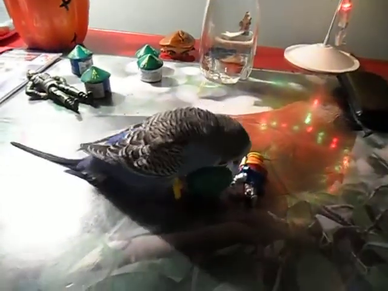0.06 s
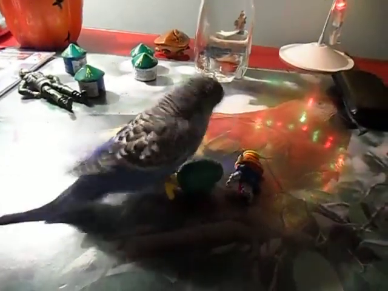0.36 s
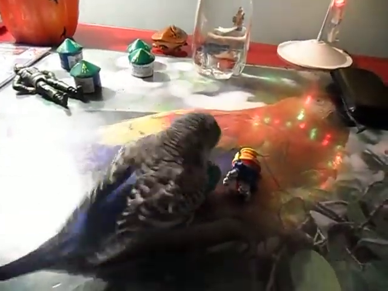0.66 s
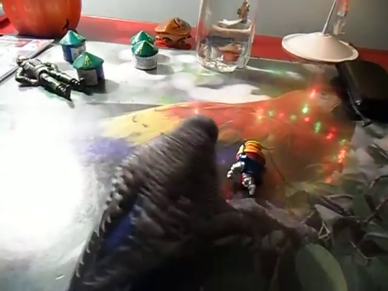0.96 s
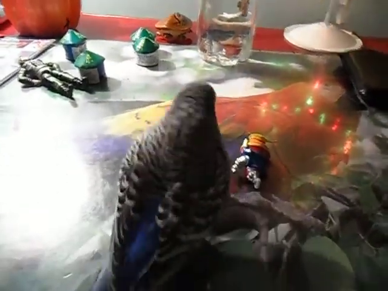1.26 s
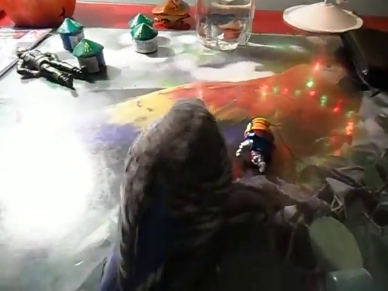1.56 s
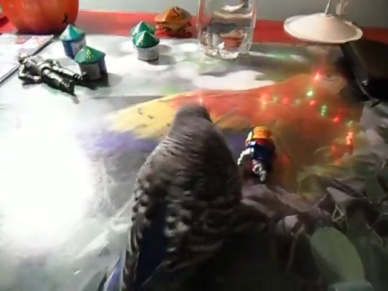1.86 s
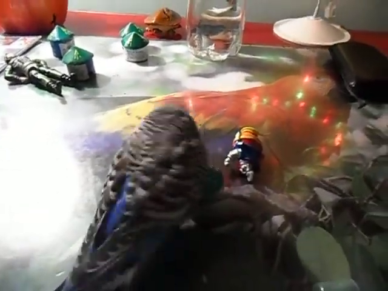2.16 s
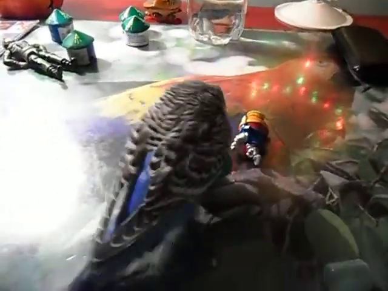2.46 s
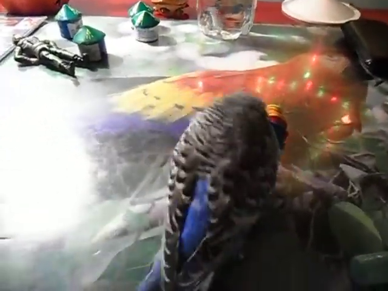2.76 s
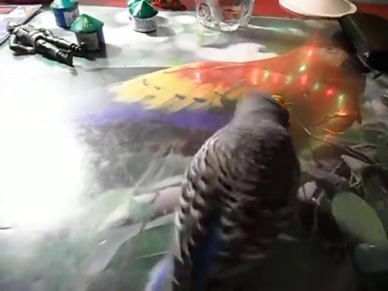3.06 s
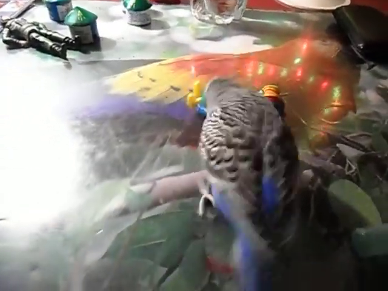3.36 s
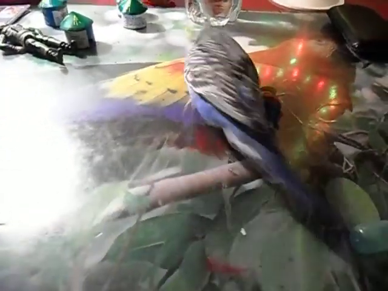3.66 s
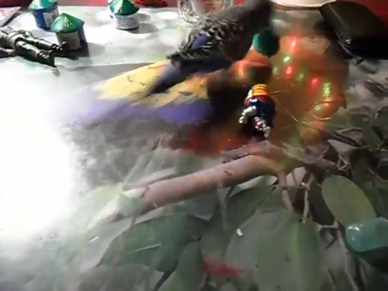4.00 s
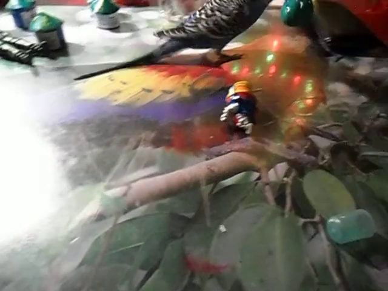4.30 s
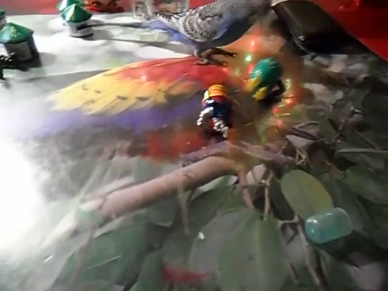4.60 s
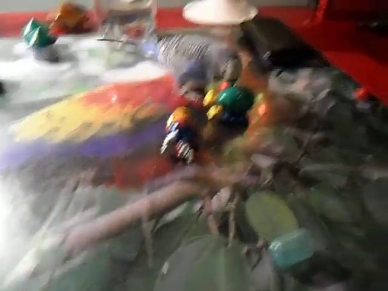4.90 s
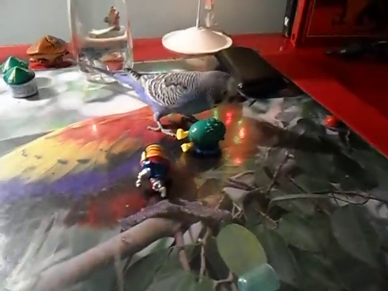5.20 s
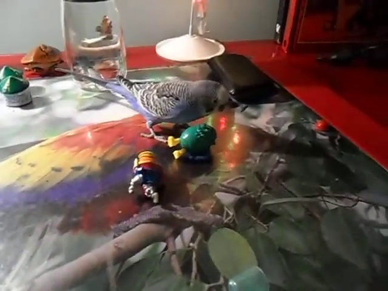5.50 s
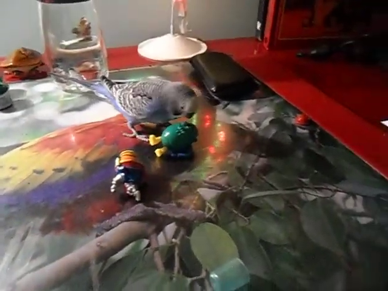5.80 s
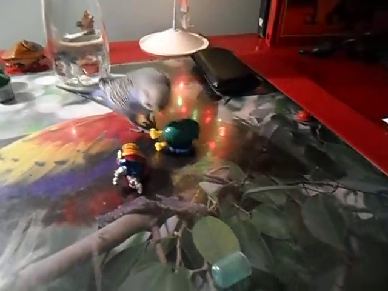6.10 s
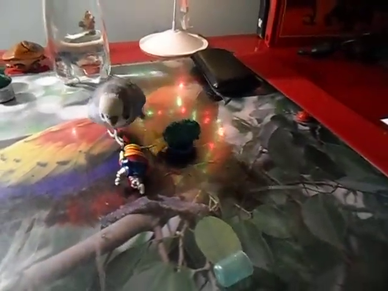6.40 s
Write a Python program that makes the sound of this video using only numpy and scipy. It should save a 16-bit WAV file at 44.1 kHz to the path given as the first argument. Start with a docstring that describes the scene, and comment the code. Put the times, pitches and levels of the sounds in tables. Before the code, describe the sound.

Close to the microphone in a quiet room, a small pet bird chirps raspily and pecks at plastic toys, making light irregular clicks and soft thuds on a tabletop. Two loud knocks of a dropped toy come about halfway, then a brief chirp and a third, doubled knock. The bird whistles one soft warble and taps on sparsely, over a faint rustle and steady hum.

```python
"""A short raspy chirp comes first: a budgerigar on a covered table in a quiet room, one microphone near.
Its beak clicks on small plastic toys, its claws scratch the cover, feet and toys bump the tabletop,
and three times a toy drops with a loud, ringing knock. The syrinx buzzes a few more chirps and
whistles one soft warble. Behind the bird lie a faint rustle and the room's steady hum and hiss."""
import sys
import numpy as np
from scipy import signal
from scipy.fft import rfft, irfft, next_fast_len
from scipy.io import wavfile
from scipy.ndimage import map_coordinates

SR = 44100
rng = np.random.default_rng(int(sys.argv[2]) if len(sys.argv) > 2 else 0)


def int16_out(signal):
    """Quantize to a 16-bit WAV file."""
    q = np.round(np.clip(np.atleast_2d(signal).T, -1, 1) * 32767)
    wavfile.write(sys.argv[1], SR, q.astype(np.int16))


N = 284445

# where the bird is busy on the table: t/s, length/s, rustle level/dB
BUSY_SPELLS = [(0, 1.92, -72), (3.949, 0.93, -71), (5.701, .72, -72.5)]
# toys and feet landing on the tabletop, near the microphone: t/s, level/dB, nominal f/Hz
BUMPS = [(0.6603, -41.5, 660), (0.8649, -38, 687), (0.8852, -38.5, 700), (1.0938, -47, 1090),
         (1.1173, -42.5, 610), (1.3355, -45.5, 488), (1.346, -37.5, 1005), (1.3739, -42, 1020),
         (1.5461, -45.5, 690), (3.143, -43.5, 1460), (3.31, -12, 811), (3.434, -38.5, 715),
         (3.6753, -13, 772), (4.0912, -41, 1064), (4.2696, -46, 940), (4.4245, -16.5, 940),
         (4.4594, -20, 820), (4.6146, -45.5, 770), (4.6398, -44.5, 637), (4.7407, -49, 1050),
         (4.8442, -46, 880), (4.958, -41, 1032), (5.9552, -48, 557), (6.0937, -46.5, 950)]
# spectrum of the tabletop's dead thud: f/Hz, level/dB
THUD_SPECTRUM = [(60, -37), (140, -19.5), (220, -15.5), (330, -9), (450, -7), (610, 5.5), (1000, 2),
                 (1350, -5.5), (1700, -12), (2300, -17.5), (3700, -25), (4700, -44.5), (9000, -44)]
# modes of the hollow toy: f/Hz, level/dB, t60/s
TOY_MODES = [(1290, -32.5, 0.05), (1790, -26.5, 0.029), (2295, -37.5, 0.059), (2900, -31, 0.032),
             (3440, -24, 0.0069)]
# modes of the tabletop: f/Hz, level/dB, t60/s
TABLETOP_MODES = [(629, -20.5, 0.3), (711, -19.5, .16), (910, -38, .1), (1011, -35.5, 0.08),
                  (1130, -47, 0.12)]
def knocks():
    """Each bump is a dead thud, higher for a harder contact; the toy rings briefly, the table longer."""
    out = np.zeros(N)
    soft_to_hard_db = [-40, -25]
    footfalls = faint_contacts(per_s=2, db=-46.5, hz=780)
    for start, db, nominal_hz in BUMPS + footfalls:
        hardness = (nominal_hz / 820) ** 0.75
        thud = crest(impulse(lambda hz: along(THUD_SPECTRUM, hz / hardness)))
        t = np.arange(len(thud)) / SR
        # a gentle contact lasts longer, so it carries less treble and more ring
        cutoff_hz = np.interp(db, soft_to_hard_db, [1800, 5000])
        toy_db = np.interp(db, soft_to_hard_db, [6, -0.5])
        table_db = np.interp(db, soft_to_hard_db, [0, -7])
        blow = thud + amp(toy_db) * ringing(TOY_MODES, t)
        blow = signal.lfilter(*signal.butter(2, cutoff_hz, fs=SR), blow)
        add(out, start, amp(db) * in_room(echoes(blow), early_db=-10, tail_db=-14))
        add(out, start, amp(db + table_db) * ringing(TABLETOP_MODES, t))
    return out


# beak and claws on plastic, close and almost dry: t/s, level/dB, ring f/Hz, relative scrape level/dB
PECKS = [(0.2533, -47, 1996, -1), (0.6394, -42.5, 3040, 13.5), (0.6484, -40.5, 2350, -7.5),
         (0.7013, -36.5, 2240, -14), (0.725, -45.5, 2220, -7.5), (0.807, -47, 2913, 5),
         (0.9638, -44.5, 2173, 10), (1.0077, -41.5, 2000, -1), (1.1488, -40.5, 1910, 4.5),
         (1.275, -46.5, 3100, -1.5), (1.468, -43, 3762, 7), (1.5924, -33.5, 4230, -2),
         (1.5974, -33.5, 3700, -5.5), (1.7523, -48, 2740, 11), (1.8822, -30, 3355, -3.5),
         (1.936, -48, 2063, 3.5), (2.741, -37.5, 3700, -8), (2.781, -47, 1800, 10), (2.9814, -40, 2330, 3),
         (3.1728, -38, 3805, 1), (3.384, -42.5, 3720, -4), (4.437, -35, 3250, 6), (4.814, -49, 3320, -3.5),
         (5.4114, -34.5, 3670, -7), (5.7822, -45, 3900, -5), (6.2596, -47.5, 2160, 6),
         (6.2757, -43.5, 3950, -12), (6.3178, -43, 3560, -8.5), (6.356, -36, 3830, -10),
         (6.3606, -35, 3820, -8)]
# spectrum of the beak scraping on plastic: f/Hz, level/dB
SCRAPE_SPECTRUM = [(200, -15), (900, -8), (2200, -6), (4100, -1.5), (5000, -7), (6000, -6), (7500, -18),
                   (11000, -32)]
def beak_clicks(t60_s=0.01494, rise_s=0.00068, crack_t60_s=0.0037, body_hz=2060, nibble_scrape_db=2):
    """The beak snaps off a toy: a crack, a few milliseconds of scrape and a cluster of plastic modes."""
    out = np.zeros(N)
    t = np.arange(SR // 16) / SR
    nibbles = [(*row, nibble_scrape_db) for row in faint_contacts(per_s=3.8, db=-49, hz=2390)]
    envelope = amp(-60 * t / t60_s) * (1 - np.exp(-t / rise_s))
    for start, db, ring_hz, scrape_db in PECKS + nibbles:
        neighbours_hz = ring_hz * (1 + np.array([-1, 1]) * rng.uniform(0.037, 0.147, 2))
        ring = np.sin(2 * np.pi * ring_hz * t)
        ring += amp(-12) * np.sin(2 * np.pi * body_hz * t)  # the toy's body answers every peck
        ring += amp(-3) * sum(np.sin(2 * np.pi * (hz * t + rng.random())) for hz in neighbours_hz)
        # a lower tap scrapes with less treble
        scrape = noise(SCRAPE_SPECTRUM, len(t))
        scrape = unit(filtered(scrape, lambda hz: 1 / np.hypot(1, (hz / (1.08 * ring_hz)) ** 2)))
        crack = amp(-17.5 - 60 * t / crack_t60_s) * rng.standard_normal(len(t))
        click = crest(envelope * (amp(-2) * unit(ring) + amp(scrape_db) * scrape)) + crack
        add(out, start, amp(db) * in_room(click, early_db=-20.5, tail_db=-31))
    return out


# raspy calls from the table: t/s, length/s, attack/s, level/dB, sag/dB, first f/Hz, settled f/Hz,
# roughness/0-1, beak resonance first f/Hz, last f/Hz
RASPY_CALLS = [(.043, 0.0417, 0.0047, -39, 12, 451.4, 439.4, 0.31, 2150, 2950),
               (.327, 0.087, 0.0018, -41, 11, 895, 624.6, 0.13, 1460, 1255),
               (0.565, .014, 0.00303, -42.5, 17, 474, 450, 0.07, 1400, 1400),
               (3.961, .037, 0.023, -36, 10.5, 561, 574.3, 0.28, 3400, 1100),
               (4.022, 0.0202, 0.0105, -44.5, 12, 550, 533, 0.94, 2600, 2400)]
# response of the bird's throat: f/Hz, level/dB
THROAT_RESPONSE = [(300, -18), (440, -4.5), (620, -10.5), (860, 3), (1300, 2), (1800, 1.5), (2300, 4.5),
                   (3300, 0), (4200, -11), (6000, -19), (9000, -34)]
def chirps(glide_s=0.038, beak_move_s=0.024, beak_db=10, beak_width_hz=270, fray=0.16):
    """The syrinx buzzes and air noise pulses with it; each chirp glides in pitch, sags and frays."""
    out = np.zeros(N)
    for start, length, attack, db, sag_db, first_hz, settled_hz, roughness, *beak_path_hz in RASPY_CALLS:
        t = note_times(length)
        pitch = np.interp(t, [0, glide_s], [first_hz, settled_hz])
        beak_hz = np.interp(t, [attack / 2, attack / 2 + beak_move_s], beak_path_hz)
        onset_db = -16.5 * np.maximum(1 - t / attack, 0)
        envelope = amp(onset_db - sag_db * t / length) * fade(t, edge_s=0.00126)
        jitter = 0.034 * (500 / pitch) ** 2  # low notes buzz less evenly
        phase = phase_of(pitch * (1 + jitter * wobble(660, len(t))))
        buzz = np.zeros(len(t))
        for k in range(1, 15):
            lift_db = beak_db * resonance(k * pitch, beak_hz, beak_width_hz)  # from the open beak
            gain = amp(along(THROAT_RESPONSE, k * pitch) + lift_db)
            buzz += gain * np.sin(k * phase + rng.uniform(0, 2 * np.pi))
        rasp = noise(THROAT_RESPONSE, len(t)) * (1 + 0.26 * np.cos(phase))
        rasp_share = np.clip(roughness + fray * t / length, 0, 1)
        voice = np.sqrt(1 - rasp_share) * unit(buzz) + np.sqrt(rasp_share) * unit(rasp)
        add(out, start, amp(db) * envelope * voice)
    return in_room(out, early_db=-21, tail_db=-10.5)[:N]


# soft whistles, with the room around them: t/s, length/s, first f/Hz, last f/Hz, level/dB
WARBLE_NOTES = [(4.846, 0.0148, 3934, 3400, -53), (4.859, 0.024, 2660, 3280, -53.5),
                (4.883, 0.0215, 4120, 4520, -49.5), (4.907, 0.016, 2900, 3010, -43.5),
                (4.923, .019, 4138, 3140, -43.5), (5.012, 0.032, 1834, 1679, -51.5),
                (5.04, .017, 1722, 1260, -45.5)]
def warble(waver=0.013, swell_db=8, pip_gap_s=0.0148, pip_step_hz=75):
    """The bird whistles quick, unsteady glides that swell and jump from note to note, then four pips."""
    out = np.zeros(N)
    # each pip falls in pitch, and lies higher and fainter than the one before
    pips = [(5.066 + k * pip_gap_s, 0.007, 1255 + k * pip_step_hz, 960 + k * pip_step_hz, -53.5 - 2.5 * k)
            for k in range(4)]
    for start, length, first_hz, last_hz, db in WARBLE_NOTES + pips:
        t = note_times(length)
        pitch = np.linspace(first_hz, last_hz, len(t))
        phase = phase_of(pitch * (1 + waver * wobble(540, len(t))))
        # the octave shows only where it meets a resonance of the throat
        octave_gain = amp(-19) * resonance(2 * pitch, centre_hz=6000, width_hz=500)
        tone = unit(np.sin(phase) + octave_gain * np.sin(2 * phase))
        envelope = amp(-swell_db * np.abs(1 - t / (0.7 * length))) * fade(t, edge_s=0.00148)
        add(out, start, amp(db) * envelope * tone)
    return in_room(out, early_db=-8, tail_db=-11.5)[:N]


# claws dragged over the table's cover, close but faint: t/s, length/s, level/dB, centre f/Hz
CLAW_DRAGS = [(1.093, 0.046, -63.5, 1500), (1.244, 0.034, -63.5, 3350), (1.363, 0.084, -63.5, 2100),
              (2.96, 0.018, -62, 2980)]
def claw_scratches(width_octaves=0.91, grains_per_s=260, grain_db=5):
    """Claws catch and slip on the cover while the bird turns: short, gritty swells."""
    out = np.zeros(N)
    for start, length, db, centre_hz in CLAW_DRAGS:
        size = int(length * SR)
        band = lambda hz: np.exp(-(np.log2((hz + 1) / centre_hz) / width_octaves) ** 2)
        hiss = filtered(rng.standard_normal(size), band)
        grit = unit(hiss * amp(grain_db * wobble(grains_per_s, size)))
        add(out, start, amp(db) * grit * signal.windows.tukey(size))
    return in_room(out, early_db=-23, tail_db=-23.5)[:N]


def rustle(still_db=-74, ramp_s=0.36, flutter_db=2.5):
    """A soft, fluttering rustle at the table rises while the bird moves about."""
    t = np.arange(N) / SR
    movement = sum(amp(db) * np.clip(np.minimum(t - start, start + length - t) / ramp_s, 0, 1)
                   for start, length, db in BUSY_SPELLS)
    low = noise([(250, -34), (550, 0), (950, -2.5), (1600, -35), (4000, -60)], N)
    high = noise([(900, -45), (1600, -5), (3200, -6.5), (4400, -18.5), (7500, -44)], N)
    return (low + high) * np.hypot(amp(still_db), movement) * amp(flutter_db * wobble(11, N))


# hum and thin whine behind the bird: f/Hz, rms level/dB
HUM_TONES = [(31, -85), (97, -81), (205, -77), (362, -71), (7852, -89.5), (7882, -94)]
# rumble and hiss all round the microphone: f/Hz, relative level/dB
AIR_SPECTRUM = [(12, -32), (20, -1), (102, -5), (122, -7), (201, -9), (235, -8), (367, -5.5), (452, -10),
                (543, -12.5), (918, -15.5), (1070, -12.5), (1190, -15.5), (1810, -20), (8080, -24),
                (10500, -25), (13600, -19), (22000, -120)]
def room_tone(drift_hz=1.22, air_db=-62):
    """The room's steady rumble and hiss, with a slightly wavering hum."""
    hum = sum(amp(db) * unit(np.sin(phase_of(hz + drift_hz * wobble(8, N)))) for hz, db in HUM_TONES)
    return hum + amp(air_db) * noise(AIR_SPECTRUM, N)


# hard surfaces near the table: delay t/s, level/dB
REFLECTIONS = [(.0055, -32.5), (.0102, -21.5), (.0190, -21.5), (.0235, -33), (.0290, -34.5)]
def echoes(x):
    """x and one reflection from each nearby surface."""
    out = x.copy()
    for delay, db in REFLECTIONS:
        add(out, delay, amp(db) * x)
    return out


# decay of the room beyond the table: f/Hz, t60/s
ROOM_DECAY = [(150, 0.46), (700, 0.3), (2800, 0.33), (5000, 0.39), (10000, 0.095)]
def in_room(x, early_db, tail_db, early_t60_s=0.024):
    """x at the microphone: direct sound, quick reflections from things nearby, then the room's tail."""
    hz, frame_s, spectra = signal.stft(rng.standard_normal(SR // 2), SR, nperseg=256)
    decay = amp(-60 * frame_s / along(ROOM_DECAY, hz)[:, None])
    tail = signal.istft(spectra * decay, SR, nperseg=256)[1]
    t = np.arange(len(tail)) / SR
    tail *= np.clip(t / 0.00614, 0, 1)
    early = rng.standard_normal(len(t)) * amp(-60 * t / early_t60_s) * (t > 0.0013)
    response = amp(early_db) * early / np.linalg.norm(early) + amp(tail_db) * tail / np.linalg.norm(tail)
    response[0] = 1  # the direct path
    return signal.fftconvolve(x, response)


def faint_contacts(per_s, db, hz, spread_db=0.5, spread_octaves=0.28):
    """Light touches scattered through the bird's busy spells, as rows of t/s, level/dB, f/Hz."""
    rows = []
    for start, length, _ in BUSY_SPELLS:
        draws = rng.random((32, 3))[:round(per_s * length)]
        for k, (when, softness, place) in enumerate(draws):
            rows.append((start + length * (k + when) / len(draws),
                         db - spread_db * (2 * softness - 1),
                         hz * 2 ** (spread_octaves * (2 * place - 1))))
    return rows


def ringing(modes, t):
    """Damped sines whose strengths differ a little from blow to blow."""
    return sum(amp(db + rng.normal(0, 1) - 60 * t / t60) * np.sin(2 * np.pi * hz * t)
               for hz, db, t60 in modes)


def resonance(hz, centre_hz, width_hz):
    """A peak of height 1 that halves at width_hz from its centre."""
    return 1 / (1 + ((hz - centre_hz) / width_hz) ** 2)


def phase_of(hz):
    """Running phase of a changing frequency, in radians."""
    return 2 * np.pi * np.cumsum(hz) / SR


def amp(db):
    """Decibels to gain."""
    return 10 ** (np.asarray(db) / 20)


def unit(x):
    """x at rms 1."""
    return x / np.sqrt(np.mean(x ** 2) + 1e-20)


def crest(x):
    """x at peak 1."""
    return x / (np.abs(x).max() + 1e-20)


def along(points, hz):
    """(f/Hz, value) points read on a log axis."""
    freqs, values = np.transpose(points)
    return np.interp(np.log(hz + 1), np.log(freqs + 1), values)


def wobble(rate, size):
    """A smooth random curve, rate knots a second."""
    return map_coordinates(rng.standard_normal(8192), [np.arange(size) * rate / SR], mode="wrap")


def filtered(x, gain):
    """x times a gain that depends on frequency."""
    size = next_fast_len(len(x) + 4096)
    return irfft(rfft(x, size) * gain(np.fft.rfftfreq(size, 1 / SR)), size)[:len(x)]


def noise(points, size):
    """Noise of rms 1, coloured by (f/Hz, level/dB) points."""
    return unit(filtered(rng.standard_normal(size), lambda hz: amp(along(points, hz))))


def impulse(gain_db, size=8192):
    """The causal pulse whose spectrum is gain_db(Hz)."""
    cepstrum = irfft(np.log(amp(gain_db(np.fft.rfftfreq(size, 1 / SR)))))
    cepstrum[1:size // 2] *= 2
    cepstrum[size // 2 + 1:] = 0
    return irfft(np.exp(rfft(cepstrum)))


def note_times(length):
    """Sample times of a note, from zero."""
    return np.arange(int(length * SR)) / SR


def fade(t, edge_s):
    """Soft start and stop of a note."""
    return np.clip(np.minimum(t - t[0], t[-1] - t) / edge_s, 0, 1)


def add(track, start_s, sound):
    """Mix a sound into the track."""
    part = track[round(start_s * SR):][:len(sound)]
    part += sound[:len(part)]


def scene():
    """Bird and toys in front, the room behind, at one microphone."""
    return (knocks() + beak_clicks() + claw_scratches() + chirps() + warble() + room_tone() + rustle())[None]


def record(dry, limit_hz=12100):
    """The microphone rolls off the top treble and keeps nothing above its band limit."""
    rolloff = [(9950, 0), (10350, -3), (11000, -16), (11500, -18), (12100, -32)]  # f/Hz, level/dB
    return np.array([filtered(x, lambda hz: amp(along(rolloff, hz)) * (hz < limit_hz)) for x in dry])


dry = scene()
out = record(dry)
int16_out(out)
```